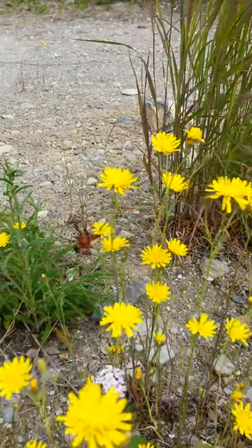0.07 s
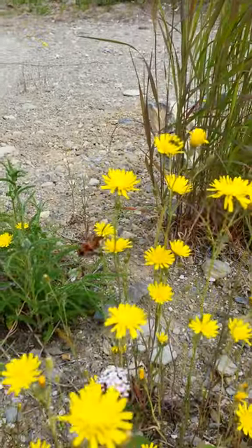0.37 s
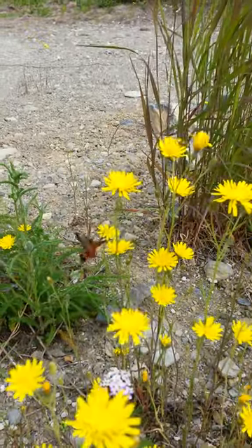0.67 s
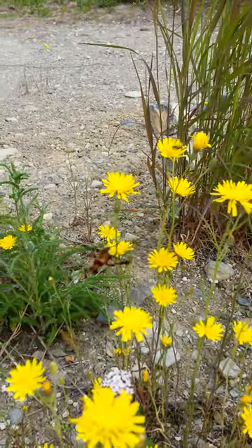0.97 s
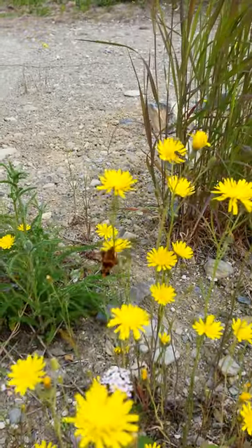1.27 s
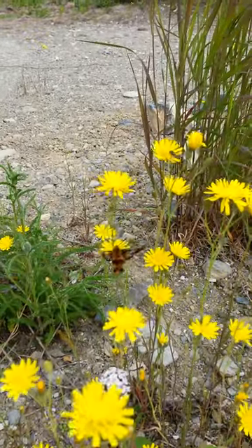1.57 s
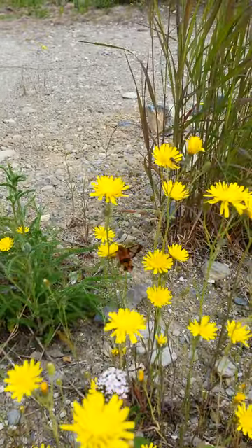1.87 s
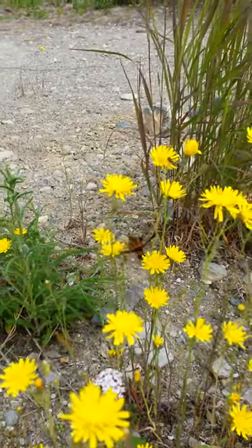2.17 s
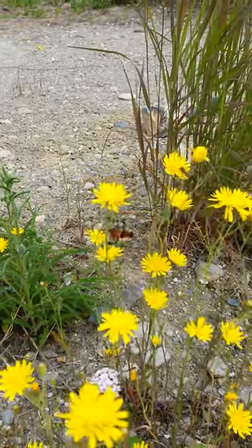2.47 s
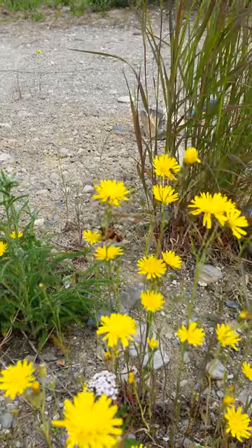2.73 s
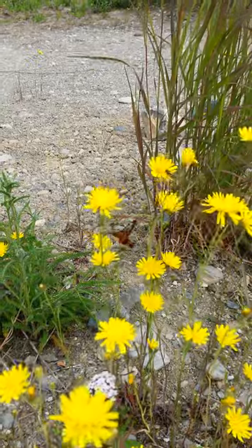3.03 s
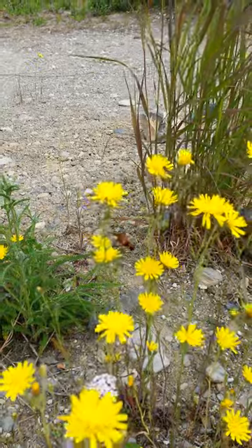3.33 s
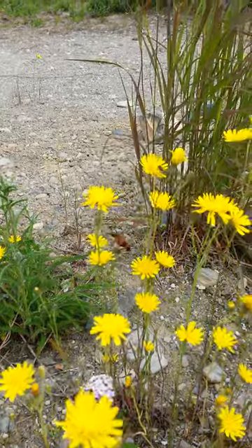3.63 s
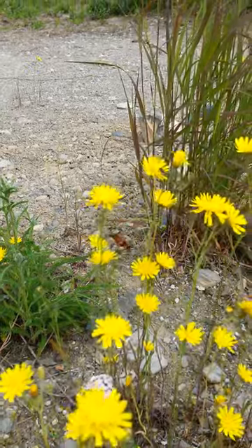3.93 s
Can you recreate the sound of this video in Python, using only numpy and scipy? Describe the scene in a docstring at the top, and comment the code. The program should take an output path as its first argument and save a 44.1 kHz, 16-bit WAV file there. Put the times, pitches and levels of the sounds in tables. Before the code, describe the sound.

Light wind blows on a microphone low in a meadow. It starts very quietly, with soft hiss, a faint low drone, a thin high whine and tiny dry grass ticks on the left. Small rumbles stir around 1.5 seconds. From about 2.8 seconds to the end, stronger gusts buffet left and right with short low thumps. Around 3.7 seconds comes a light close tap on the left, then two fainter ones.

```python
"""Light breeze over a roadside meadow

Close to the ground, on a small camera's two microphones. Late on the wind rises: eddies buffet the
two ports separately, and something taps lightly right by the left one, where dry grass also ticks.
Behind, soft open air and a low drone near 95 Hz, perhaps a far engine, lie under the microphones'
own hiss and a thin electronic whine."""
import sys
import numpy as np
from scipy.fft import rfft, irfft, next_fast_len
from scipy.io import wavfile
from scipy.ndimage import uniform_filter1d, map_coordinates

SR = 44100
rng = np.random.default_rng(int(sys.argv[2]) if len(sys.argv) > 2 else 0)


def generate_wav(sig):
    """Save sig (samples, or channels by samples) to the path in sys.argv[1] as 16-bit PCM at SR."""
    pcm = np.round(np.clip(np.atleast_2d(sig).T, -1, 1) * 32767).astype(np.int16)
    wavfile.write(sys.argv[1], SR, pcm)


N = 176400

# Wind on each port: time_s, level_db
BUFFET_LEFT = [(0, -75), (1.5, -66.5), (1.58, -50), (1.63, -66), (1.72, -50), (1.95, -69), (2.5, -66),
               (2.57, -54), (2.84, -54), (2.98, -43), (3.03, -41.5), (3.09, -53), (3.17, -42.5),
               (3.29, -39.5), (3.38, -50), (3.64, -54), (3.72, -47.5), (4, -52)]
BUFFET_RIGHT = [(0, -71), (.85, -67), (1.3, -56.5), (1.62, -59), (1.73, -49), (2, -63), (2.42, -58.5),
                (2.56, -49.5), (2.76, -60), (2.81, -38), (2.88, -61), (2.95, -36), (3.03, -55), (3.14, -51),
                (3.23, -40), (3.37, -49), (3.42, -40), (3.6, -43), (3.65, -50), (3.69, -41), (3.89, -39),
                (3.93, -59), (4, -40)]
# Single eddies striking a port: centre_s, peak_db, half_width_s, side (0 left, 1 right)
EDDY_HITS = [(2.796, -30, .003, 1), (2.817, -28, 0.0021, 1), (2.98, -34, 0.0029, 0),
             (3.172, -34.5, 0.0041, 0), (3.273, -25, 0.0046, 0), (3.287, -28, 0.0026, 0),
             (3.326, -27.5, 0.0027, 1), (3.503, -32.5, 0.0014, 1), (3.591, -22, 0.0026, 1),
             (3.621, -28.5, 0.0031, 1), (3.882, -31, 0.0026, 1), (3.89, -26, 0.0017, 1),
             (3.981, -29, 0.0016, 1)]
# Taps by the left port: centre_s, peak_db, width_s
TAP_HITS = [(3.7202, -23.5, 0.00071), (3.764, -36, 0.00093), (3.829, -34.5, 0.00067)]
# Shared rise and fall of grass, air, drone, hiss and whine: time_s, level_db
BACKGROUND_LEVEL = [(0.0, -74), (0.2, -73.5), (0.71, -74), (1.1, -71.5), (1.36, -72), (1.83, -70),
                    (1.92, -71.5), (2.45, -72.5), (2.57, -68.5), (2.7, -70), (3.27, -67.5), (3.85, -66.5),
                    (4.0, -68.5)]
# The drone's own swells on top of that: time_s, gain_db
DRONE_SWELLS = [(0, 5), (.04, -5.5), (.09, 5.5), (.17, -7.5), (.22, 4), (.34, -8), (.57, -0.5), (.68, -9),
                (.73, 2), (.88, -1.5), (.91, -2.5), (1.0, 1.5), (1.12, -0.5), (1.3, -7.5), (1.72, 2),
                (2.21, 0), (2.27, -4), (2.5, -1)]
# How alike the open air is left and right: frequency_hz, correlation
AIR_LIKENESS = [(40, 0.13), (110, 1), (250, 0.43), (500, 0.098), (1200, 0.13), (3000, 0)]
# Tone colour of each noise: frequency_hz, relative_density_db
BUFFET_SPECTRUM = [(15, -24), (32, -9.5), (55, -2), (85, 1.5), (115, -4), (160, -11), (230, -23.5),
                   (400, -35.5), (1200, -56.5)]
TICK_SPECTRUM = [(300, 7), (2000, -2), (4000, -8), (6000, -1), (7500, -22), (14000, -22)]
PUFF_SPECTRUM = [(1000, -29), (4500, -13), (5800, 0), (7500, -13), (10000, -1), (12800, 8), (14500, -2)]
AIR_SPECTRUM = [(20, -7.5), (60, 5), (120, 7.5), (200, 4.5), (320, -1), (550, -3.5), (1000, -9),
                (2000, -17), (5000, -29.5)]
DRONE_SPECTRUM = [(20, -34), (55, -19.5), (78, -9.5), (89, -7.5), (95, 2.5), (104, -7.5), (116, -9.5),
                  (127, -9), (140, -17), (175, -18.5), (230, -28.5), (500, -53)]
HISS_LEFT_SPECTRUM = [(300, -6), (2000, 2.5), (4200, 2), (5200, 3.5), (5900, 6.5), (6700, 0), (9000, -1),
                      (14500, -1)]
HISS_RIGHT_SPECTRUM = [(300, -4.5), (2000, 2.5), (4200, 1.5), (7000, -1), (10800, 0), (12200, 4),
                       (13300, 2), (14500, -3.5)]


def buffeting(lump_db=1.5):
    """Lumpy turbulence right on the microphones, unrelated between the two ports."""
    return np.array([amp(curve(wind) + lump_db * wobble(24.01)) * steadied(noise(BUFFET_SPECTRUM))
                     for wind in (BUFFET_LEFT, BUFFET_RIGHT)])


def eddies():
    """Each strong eddy is one smooth push on one port."""
    out, t = np.zeros((2, N)), np.arange(N) / SR
    for centre_s, peak_db, half_width_s, side in EDDY_HITS:
        push = np.exp(-((t - centre_s) / half_width_s) ** 2)
        out[int(side)] += amp(peak_db) * port(push)
    return out


def taps(soft_hz=1280, tick_db=-22.5, tick_t60_s=0.014, right_db=-24):
    """A soft pull and push with a faint tick, perhaps a stalk touching the camera."""
    out, t = np.zeros(N), np.arange(N) / SR
    for centre_s, peak_db, width_s in TAP_HITS:
        u = (t - centre_s) / width_s
        pull_push = u / (1 + u ** 2) ** 1.5
        bump = filtered(pull_push, lambda hz: 1 / (1 + (hz / soft_hz) ** 4))  # soft contact, little top
        tick_decay = (t > centre_s) * amp(tick_db - 60 * np.abs(t - centre_s) / tick_t60_s)
        out += amp(peak_db) * (port(bump) + tick_decay * noise(TICK_SPECTRUM))
    return out * amp([[0], [right_db]])


def port(pressure, cut_hz=93.3, q=1.5):
    """A push of air through the microphone's resonant bass cut, which rings briefly; peak 1."""
    rung = filtered(pressure, lambda hz: -hz ** 2 / (cut_hz ** 2 - hz ** 2 + 1j * hz * cut_hz / q))
    return rung / np.abs(rung).max()


def puff(centre_s=2.58, half_width_s=0.043, level_db=-63, left_db=-6):
    """A brief airy hiss as the gust sets in, mostly on the right."""
    swell = np.exp(-((np.arange(N) / SR - centre_s) / half_width_s) ** 2)
    return amp(level_db) * swell * np.array([amp(left_db) * noise(PUFF_SPECTRUM), noise(PUFF_SPECTRUM)])


def grass(ticks_per_s=90, ring_hz=5600, q=5, gain_db=-4.5, spread_db=3, clump_db=2.5):
    """Fine random ticks of dry grass, close by, ring a broad resonance of the left port."""
    ticks = (rng.random(N) < ticks_per_s / SR) * amp(spread_db * rng.standard_normal(N))
    ring = filtered(ticks, lambda hz: 1j * hz / (ring_hz ** 2 - hz ** 2 + 1j * hz * ring_hz / q))
    left = amp(gain_db) * unit(ring * amp(clump_db * wobble(13)))
    return np.array([left, np.zeros(N)])


def air(gain_db=10, flutter_db=0.82):
    """Soft wide rush of the open air, alike on both microphones only in the bass."""
    def mid_side(hz):
        angle = np.arccos(np.clip(along(AIR_LIKENESS, hz), -1, 1)) / 2
        return amp(along(AIR_SPECTRUM, hz)) * [np.cos(angle), np.sin(angle)]
    mid, side = filtered(rng.standard_normal((2, N)), mid_side)
    return amp(gain_db + flutter_db * wobble(12)) * unit(np.array([mid + side, mid - side]))


def drone(gain_db=15.5, waver_db=1.1, left_db=-1.5):
    """A narrow, wavering low drone, perhaps a far engine, reaching both ports in step."""
    swell = amp(gain_db + curve(DRONE_SWELLS) + waver_db * wobble(16))
    return swell * steadied(noise(DRONE_SPECTRUM)) * amp([[left_db], [0]])


def hiss(left_db=6.5, right_db=5, flutter_db=0.32):
    """Each microphone has its own hiss."""
    left = amp(left_db) * noise(HISS_LEFT_SPECTRUM)
    right = amp(right_db) * noise(HISS_RIGHT_SPECTRUM)
    return np.array([left, right]) * amp(flutter_db * wobble(14))


def whine(pitch_hz=12100, drift_hz=1.2, left_db=-18.5, right_db=0.5):
    """A thin, nearly steady tone of the camera's electronics, mostly on the right."""
    phase = 2 * np.pi * np.cumsum(pitch_hz + drift_hz * wobble(4)) / SR
    return np.sqrt(2) * np.array([amp(left_db) * np.cos(phase), amp(right_db) * np.sin(phase)])


def amp(db):
    """Decibels to gain."""
    return 10 ** (np.asarray(db) / 20)


def unit(x):
    """Scale to rms 1."""
    return x / np.sqrt(np.mean(x ** 2) + 1e-20)


def along(points, hz):
    """Read (frequency_hz, value) points along a log frequency axis."""
    knots_hz, values = np.transpose(points)
    return np.interp(np.log(hz + 1), np.log(knots_hz + 1), values)


def curve(points):
    """Join (time_s, value) points, one value per sample."""
    return np.interp(np.arange(N) / SR, *np.transpose(points))


def wobble(knots_per_s):
    """A smooth random curve."""
    return map_coordinates(rng.standard_normal(512), [np.arange(N) * knots_per_s / SR], mode="wrap")


def filtered(x, response):
    """Pass x through a complex frequency response."""
    size = next_fast_len(N + SR // 2)
    return irfft(rfft(x, size) * response(np.fft.rfftfreq(size, 1 / SR)), size)[..., :N]


def noise(spectrum):
    """Coloured noise of rms 1."""
    return unit(filtered(rng.standard_normal(N), lambda hz: amp(along(spectrum, hz))))


def steadied(x, size=2205):
    """Noise with its chance swells evened out over size samples."""
    return unit(x / np.sqrt(np.abs(uniform_filter1d(x ** 2, size)) + 1e-9))


def scene():
    """Wind and taps right at the ports, over a background that rises and falls as one."""
    background = amp(curve(BACKGROUND_LEVEL)) * (hiss() + grass() + air() + drone() + whine())
    return background + puff() + buffeting() + eddies() + taps()


def record(dry, top_hz=14550):
    """The camera keeps nothing above its band limit."""
    return filtered(dry, lambda hz: hz < top_hz)


dry = scene()
out = record(dry)
generate_wav(out)
```